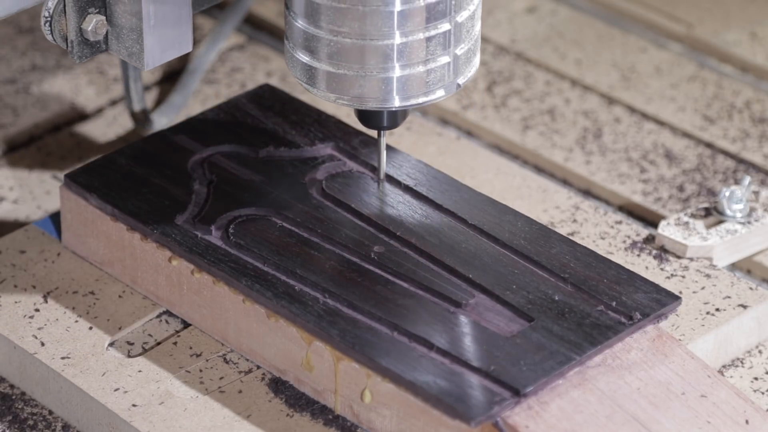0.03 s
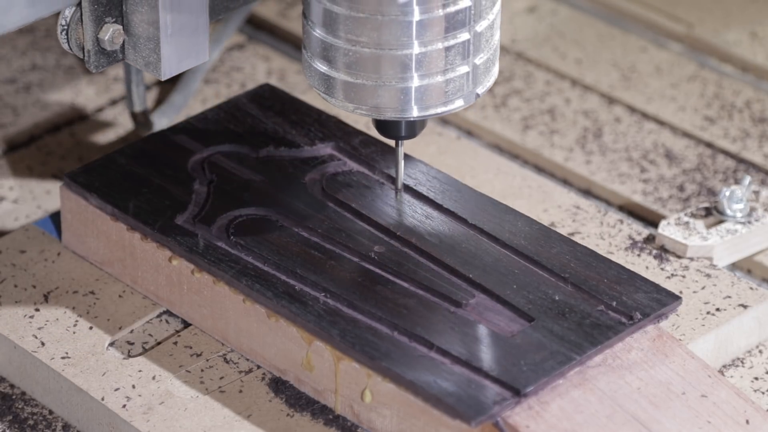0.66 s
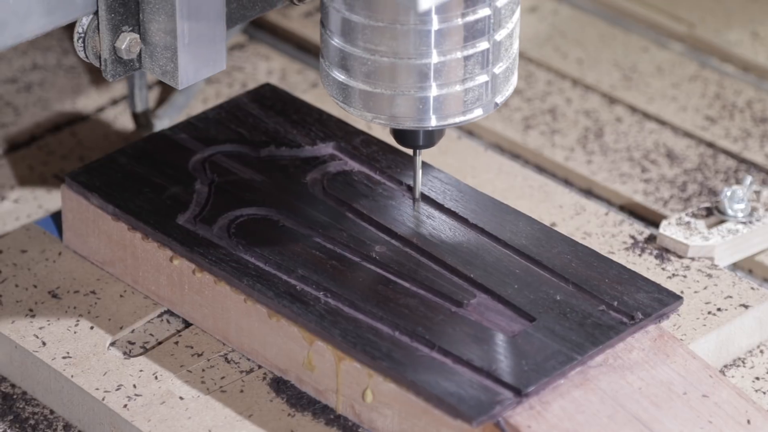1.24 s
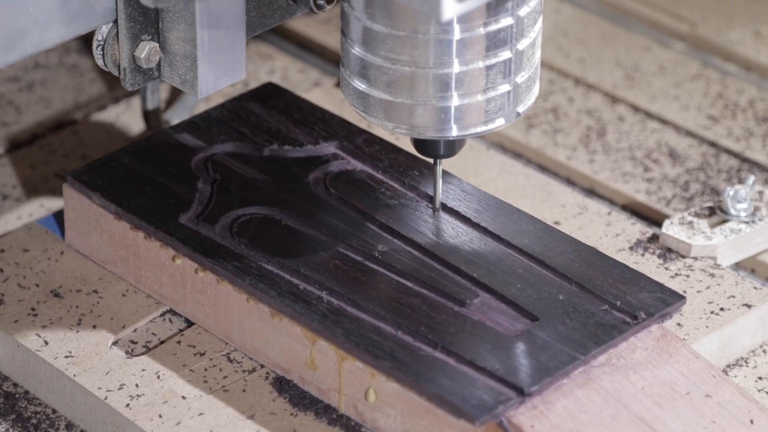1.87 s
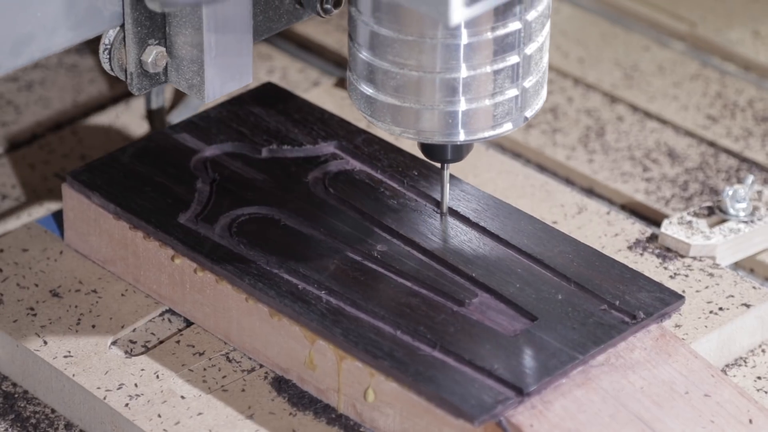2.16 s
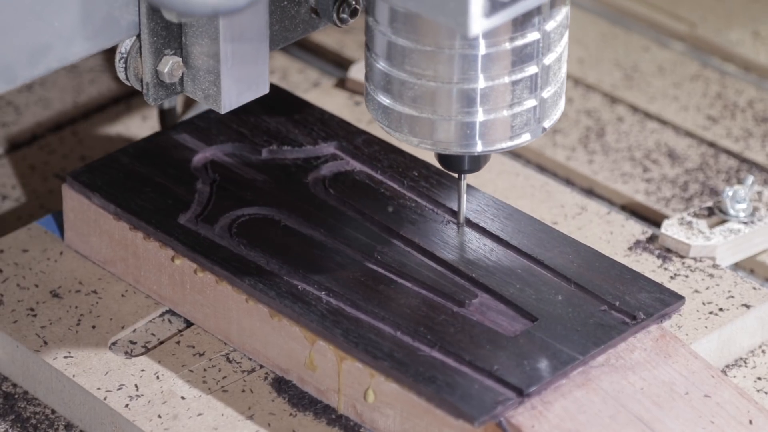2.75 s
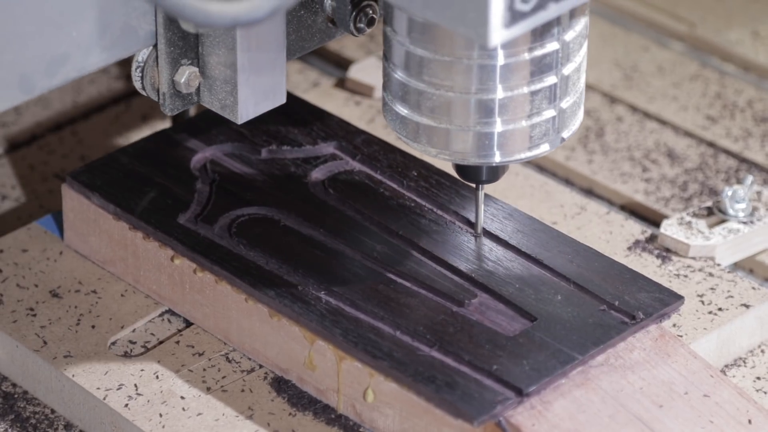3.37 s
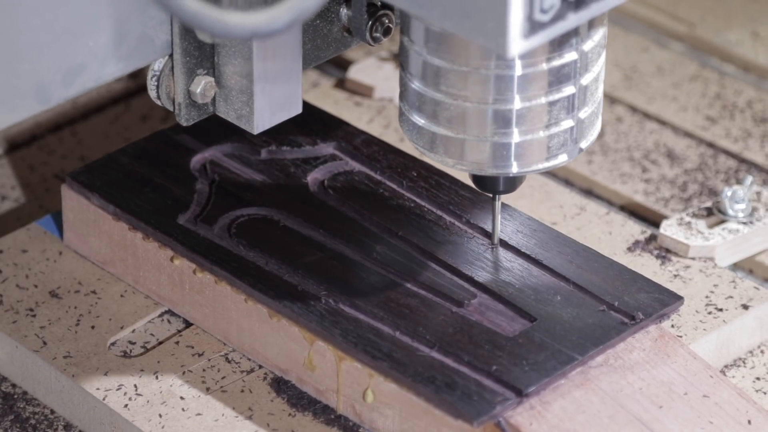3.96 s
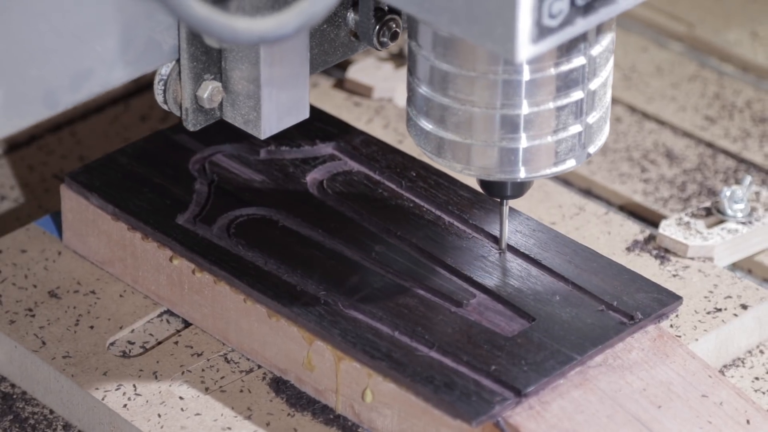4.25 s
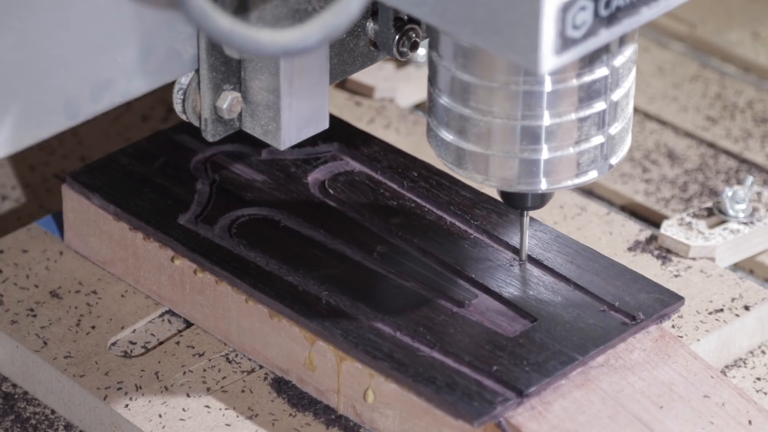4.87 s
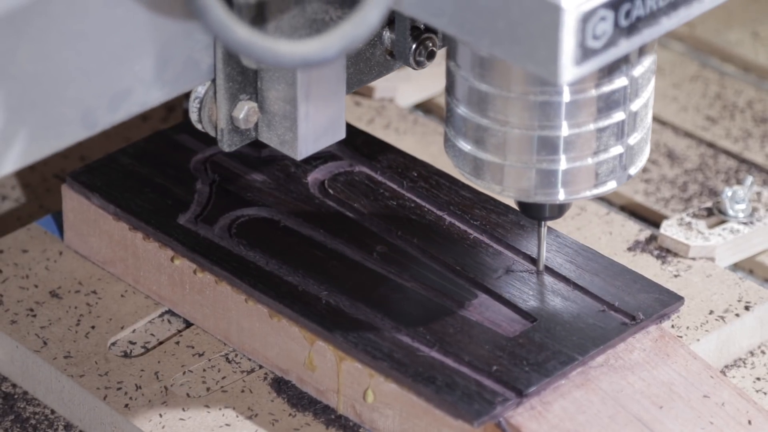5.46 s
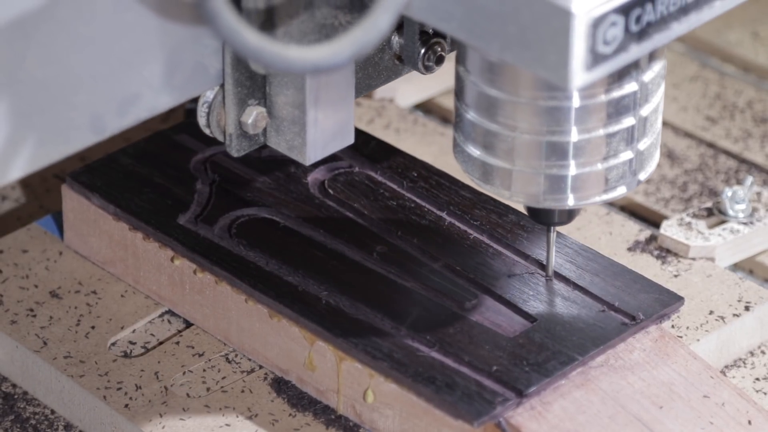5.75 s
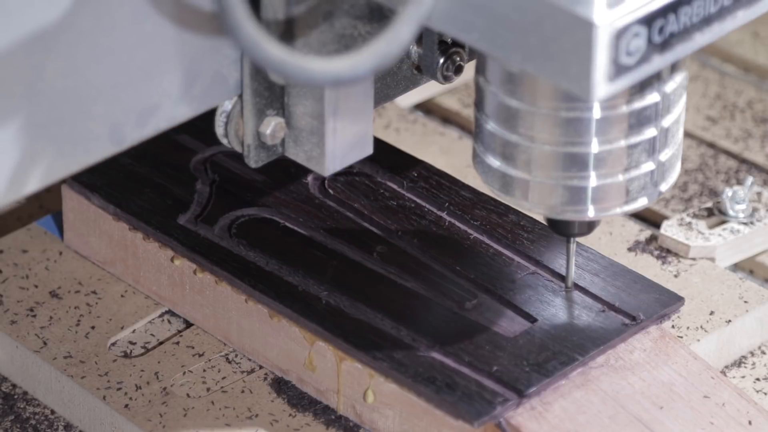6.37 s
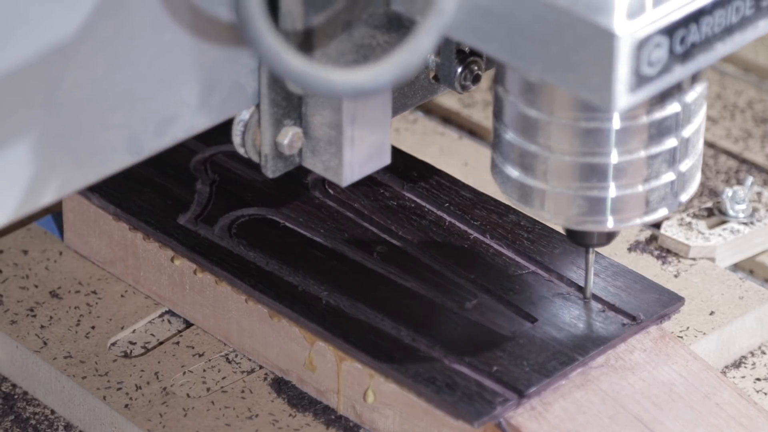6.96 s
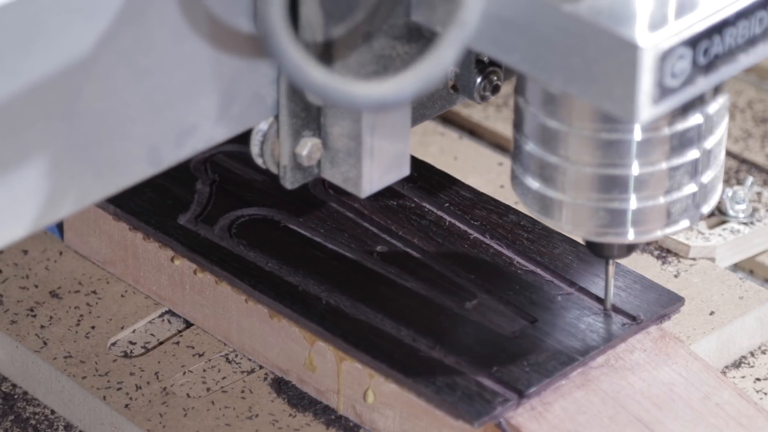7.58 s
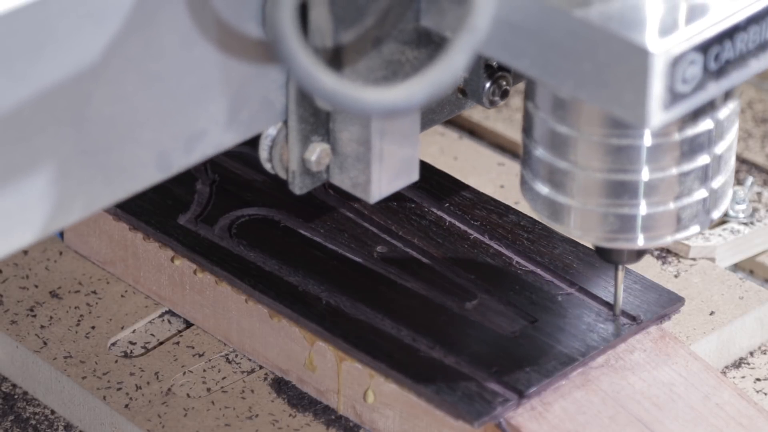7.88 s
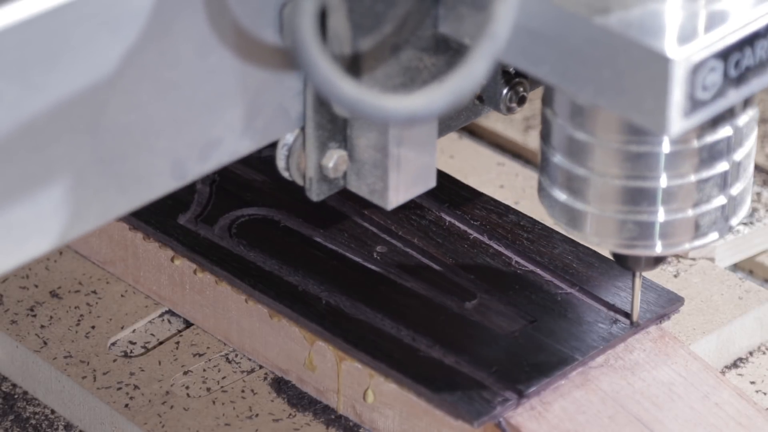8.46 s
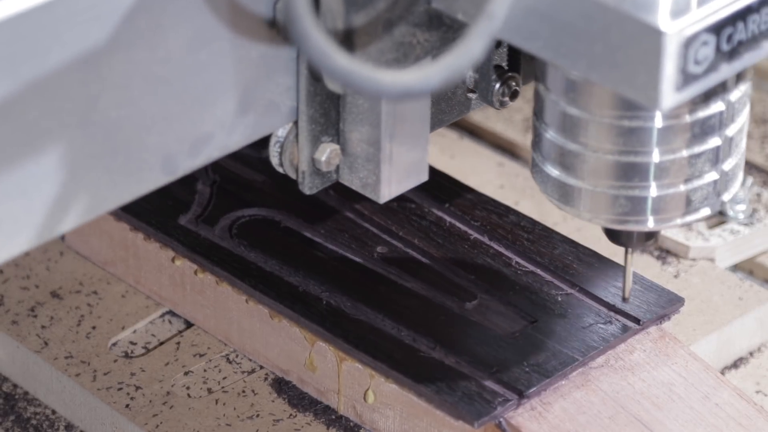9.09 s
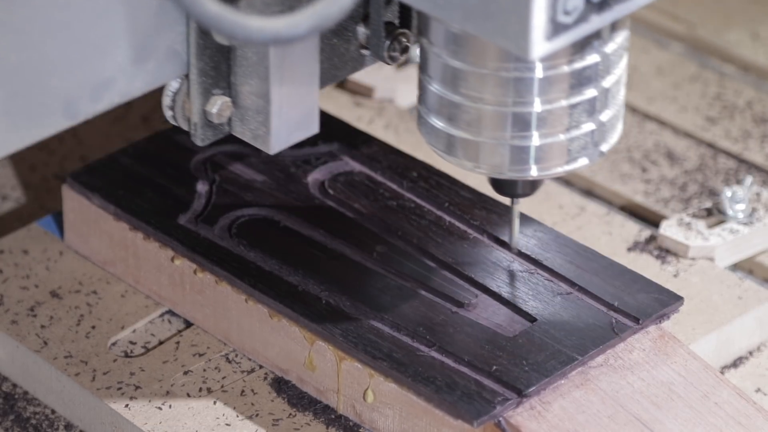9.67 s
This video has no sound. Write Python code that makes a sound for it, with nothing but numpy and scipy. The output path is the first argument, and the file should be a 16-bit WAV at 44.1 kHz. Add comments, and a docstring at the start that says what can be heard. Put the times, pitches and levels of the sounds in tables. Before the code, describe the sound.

A milling spindle whines as its bit hisses and chatters through wood, then squeals out of the cut while stepper motors whirr up.

```python
"""A workshop, with a stereo pair of microphones close to a CNC router cutting a groove in hardwood.
The small bit's two flutes tear off hissing chips, and its slender shank chatters between the
spindle's harmonics. The trim motor hums and whines at about 15700 rpm over the rush of its fan.
Near the end the bit squeals up out of the groove, the motor runs free and the stepper motors
whirr up for a rapid move."""
import sys
import numpy as np
from scipy import signal
from scipy.fft import rfft, irfft, next_fast_len
from scipy.io import wavfile

SR = 44100
rng = np.random.default_rng(int(sys.argv[2]) if len(sys.argv) > 2 else 0)


def materialize(psi):
    """Save the field psi as 16-bit PCM at rate SR to the path in sys.argv[1].

    A 1-D psi becomes a single channel; in a 2-D psi each row is a channel.
    """
    bounded = np.clip(np.atleast_2d(psi).T, -1, 1)
    quanta = np.round(bounded * 32767).astype(np.int16)
    wavfile.write(sys.argv[1], SR, quanta)


N = 429093
T = np.arange(N) / SR


def undb(db):
    """Decibels to gain."""
    return 10 ** (np.asarray(db) / 20)


def curves(table):
    """One sample-rate curve for each column after the time."""
    times, *columns = np.transpose(table)
    return [np.interp(T, times, column) for column in columns]


def swells(table, attack_s=0.024, release_s=0.045):
    """Attack, hold and release for each (start_s, length_s, size, ...) row; one curve per size column."""
    out = np.zeros((len(table[0]) - 2, N))
    for start, length, *sizes in table:
        near = slice(*np.searchsorted(T, [start - attack_s, start + length + release_s]))
        rise = (T[near] - start) / attack_s
        fall = (start + length - T[near]) / release_s
        out[:, near] += np.outer(sizes, np.clip(.5 + np.minimum(rise, fall), 0, 1))
    return out


def colour(points, hz):
    """Gain of a (frequency_hz, gain_db) spectrum at the given frequencies."""
    points_hz, db = np.transpose(points)
    return undb(np.interp(np.log(np.maximum(hz, 1)), np.log(points_hz), db))


def walk(rate):
    """Smooth random motion of spread 1 that changes about rate times a second."""
    hz = np.fft.rfftfreq(4096, T[-1] / 4096)
    motion = irfft(rfft(rng.standard_normal(4096)) * np.exp(-2 * (hz / rate) ** 2))
    return np.interp(T, np.linspace(0, T[-1], len(motion)), motion / motion.std())


def angle(hz):
    """Phase in radians of something that turns at hz."""
    return 2 * np.pi * np.cumsum(hz) / SR


def cosine(phase):
    """Cosine of a long-running phase, in single precision."""
    turns = phase / (2 * np.pi)
    return np.cos((2 * np.pi * (turns - np.floor(turns))).astype(np.float32))


def stereo(mid, side):
    """Left and right from mid and side."""
    return np.array([mid + side, mid - side])


def pan(sound, db):
    """Place a sound between the microphones by left minus right dB."""
    return sound * undb(np.array([[db], [-db]]) / 2)


# The workshop's reflections at the two microphones: frequency_hz, side_minus_mid_db
ROOM_WIDTH = [(40, -27), (110, -22), (270, -21), (520, -6), (800, -8), (1100, -9), (2000, -2), (4000, -2.5),
              (12000, -2)]


def tone(phase, gain, rough, rate=30):
    """A partial that trembles in strength; its reflections shift slowly as the gantry moves."""
    hz = phase[-1] / (2 * np.pi * T[-1])
    phase = phase + rng.uniform(0, 2 * np.pi)
    gain = gain * (1 + rough * walk(rate)) / np.sqrt(1 + rough ** 2)
    reflected = rng.choice([-1, 1]) * np.pi / 2 + .5 * walk(1.0)
    return stereo(gain * cosine(phase), gain * colour(ROOM_WIDTH, hz) * cosine(phase + reflected))


def noise(points):
    """Stereo noise of the given colour, rms 1 in the middle, wider in the treble."""
    size = next_fast_len(N, True)
    hz = np.fft.rfftfreq(size, 1 / SR)
    mid, side = rfft(rng.standard_normal((2, size))) * colour(points, hz)
    mid = irfft(mid, size)[:N]
    side = irfft(side * colour(ROOM_WIDTH, hz), size)[:N]
    return stereo(mid, side) / mid.std()


# The spindle sags under load and rises once free: time_s, speed_hz
SPINDLE_SPEED = [(0, 261.5), (0.5, 261.8), (5.8, 261.85), (6.5, 262.15), (6.6, 261), (7.45, 261.7),
                 (7.55, 262.3), (8.2, 262.1), (8.37, 261.2), (8.46, 262.1), (8.7, 263), (9.05, 263),
                 (9.5, 262.3)]
HUNT_RATE_HZ, HUNT_DEPTH_HZ, HUNT_CREST_S, HUNT_SETTLES_S = 2.24, 0.37, 1.85, 3.59


def spindle_speed():
    """Turns a second: the governor overshoots back and forth, then settles."""
    hz, = curves(SPINDLE_SPEED)
    unsettled = np.clip(.5 + HUNT_SETTLES_S - T, 0, 1)
    hunting = HUNT_DEPTH_HZ * unsettled * np.cos(2 * np.pi * HUNT_RATE_HZ * (T - HUNT_CREST_S))
    return hz + hunting + 0.0922 * walk(6.6)


# Chip hiss and the bit's resonances near 3.1, 3.6 and 4.1 kHz: time_s, hiss_db, low_db, mid_db, high_db
STEADY_CUT = [(0, -32, -37.5, -29.5, -43), (1.7, -33, -37.5, -40, -35), (3.3, -33, -33.5, -37, -32.5),
              (4.6, -31, -28.5, -38.5, -30.5), (6.45, -33, -35, -41, -30.5), (6.65, -31, -30.5, -32, -30),
              (7.5, -33, -31.5, -30.5, -30.5), (7.7, -37, -28.5, -46, -33.5),
              (8.45, -32.5, -36, -36, -32.5), (8.68, -30, -37, -44, -46), (8.76, -56, -49, -47, -46),
              (9.4, -31, -43, -44, -48)]
# The bit digs into hard grain and bursts into chatter: start_s, length_s, hiss_rise_db, chatter_rise_db
GRAIN_BITES = [(0.01, 0.12, -0.5, 12), (0.22, 0.11, 1, 2), (0.32, 0.13, -1, 15), (0.71, 0.12, 3.5, 7),
               (0.82, 0.13, 1, 15.5), (1.02, 0.094, 3, 12), (1.15, 0.089, 3, 13), (1.64, .09, 2, 14.5),
               (2.07, .24, 2.5, 7), (2.34, 0.067, 2, 13), (2.68, 0.3, 1.5, -4), (2.93, .17, 2.5, 8),
               (3.26, 0.19, 2.5, 13), (3.52, 0.16, 1.5, 11), (3.79, 0.15, 0, 12), (4.11, 0.097, -1.5, 7.5),
               (4.44, .12, 1.5, 8), (4.64, 0.15, 1.5, 9), (4.85, 0.3, 2, 10.5), (5.26, 0.11, 0.5, 8),
               (5.51, 0.19, 2.5, 10.5), (5.73, 0.53, 1, 8), (6.32, 0.27, 0.3, 8.5), (6.57, 0.079, 2.5, 2),
               (6.86, .15, 1, 5), (7.13, 0.085, 0, 6), (7.35, 0.16, 0.5, 4), (7.83, .09, 4, 4),
               (8.1, 0.11, 2.5, 7), (8.23, 0.21, 3.5, 12)]
# How the mid and high resonances follow a bite, a row each: db_per_hiss_db, db_per_chatter_db
RESONANCE_RISE = [(3, -0.08), (1.0, 0.226)]
# The bit finds little wood and the whole cut slackens: start_s, length_s, drop_db
SLACK_SPOTS = [(0.11, 0.065, 5), (4.33, .08, 2.5), (5.35, 0.067, 8), (7.01, 0.12, 3), (7.61, 0.058, 11),
               (8.45, .08, 8)]


def cutting_levels():
    """Levels of the hiss and the three resonances: the steady cut, with its bites and slack spots."""
    hiss_db, low_db, *upper_db = curves(STEADY_CUT) - swells(SLACK_SPOTS)
    hiss_rise, chatter_rise = swells(GRAIN_BITES)
    upper_db = [db + by_hiss * hiss_rise + by_chatter * chatter_rise
                for db, (by_hiss, by_chatter) in zip(upper_db, RESONANCE_RISE)]
    return hiss_db + hiss_rise, [low_db + chatter_rise, *upper_db]


# Tearing hardwood, heard from close by: frequency_hz, gain_db
CHIP_COLOUR = [(400, -43), (900, -34), (1900, -13), (2400, -1.5), (2900, 2), (3900, -0.5), (4600, -4.5),
               (5700, -1), (6600, 1.5), (7700, 3.5), (8900, -3.5), (9800, 1), (11000, -5), (16000, -12)]


def chips(turn, contact, hiss_db):
    """Each pass of the two flutes tears off chips of uneven size: a hiss that throbs with the turn."""
    throb_db = 0.44 * cosine(turn) + 0.45 * cosine(2 * turn) + 0.99 * walk(180) + 0.4 * walk(40)
    return noise(CHIP_COLOUR) * contact * undb(hiss_db + throb_db + 4.5)


# The ringing bit, struck lightly (0) to hard (1): time_s, cycles_per_turn, hardness
BIT_RING = [(0, 11.71, 0), (.8, 11.73, 0), (2.9, 11.72, .1), (3.4, 11.7, .3), (4.8, 11.7, .6),
            (6.5, 11.69, .7), (6.62, 11.63, 1), (7.5, 11.635, 1), (7.6, 11.64, .8), (8.4, 11.65, 1)]
# Weaker tones either side of the ring: offset_cycles_per_turn, light_strike_db, hard_strike_db
RING_SIDEBANDS = [(-2, -44, -39.5), (-1, -39, -39.5), (1, -48, -37.5), (3, -50, -42), (5, -49, -46),
                  (6, -51, -51), (7, -52, -46), (13, -47, -51)]
SPUTTER_DB, SPUTTER_HZ = 1.6, 30.3  # the chatter keeps catching and losing its grip


def chatter(spindle_hz, turn, levels_db):
    """The bit rings in bursts near 3 kHz; each turn strikes it anew, spreading sidebands a turn apart."""
    ratio, hardness = curves(BIT_RING)
    low, mid, high = (undb(db + SPUTTER_DB * walk(SPUTTER_HZ)) for db in levels_db)
    ring = angle(ratio * spindle_hz) + 0.11 * walk(25)
    out = tone(ring, low * undb(-2.5), rough=.15)
    # two sidebands meet resonances of their own and flare separately
    out += tone(ring + 2 * turn + .4 * walk(30), mid, rough=.35)
    out += tone(ring + 4 * turn + .3 * walk(30), high * undb(-2.5), rough=.2)
    swell = (mid * high * undb(81)) ** .3  # the weaker ones gently follow those two
    for offset, light_db, hard_db in RING_SIDEBANDS:
        db = light_db + hardness * (hard_db - light_db)
        out += tone(ring + offset * turn + .4 * walk(30), swell * undb(db), rough=.4)
    return out * np.interp(T, [8.42, 8.49], [1, 0])  # the ringing stops as the bit starts to rise


# The once-a-turn hum, held down while the bit is pressed hard: time_s, level_db
UNBALANCE = [(0.06, -30.5), (0.67, -29), (1.02, -30), (1.72, -27.5), (4.02, -28), (4.68, -26.5),
             (5.94, -28.5), (6.53, -27.5), (6.66, -32.5), (7.25, -31.5), (7.44, -33), (7.71, -27.5),
             (8.29, -25.5), (8.4, -34), (8.51, -24.5), (8.99, -22.5), (9.12, -19.5), (9.66, -19)]
# Its strongest overtone: time_s, level_db
FOURTH_HARMONIC = [(0, -28), (1.1, -28), (1.38, -24.5), (2.1, -29), (2.75, -26), (3.5, -32), (4.5, -27.5),
                   (6.48, -31), (6.59, -24.5), (6.7, -39.5), (7.27, -30), (7.6, -37.5), (8.28, -29.5),
                   (8.35, -25), (8.43, -43), (8.55, -35), (8.75, -41), (9.73, -34.5)]


def motor_hum(turn):
    """Unbalance hums once a turn, just left of centre, and shakes the frame."""
    hum_db, = curves(UNBALANCE)
    fourth_db, = curves(FOURTH_HARMONIC)
    hum = tone(turn, undb(hum_db + 3.5), rough=0.015)
    hum += tone(4 * turn, undb(fourth_db + 1.53 + 0.75 * walk(3.5)), rough=0.019)
    return pan(hum, db=0.65) + frame_shake(hum_db)


# The shaking frame: frequency_hz, gain_db
SHAKE_COLOUR = [(20, -19), (40, 16.5), (80, -36), (135, 10.5), (200, 0), (400, -40), (1500, -38)]


def frame_shake(hum_db):
    """A faint low rumble that follows the unbalance."""
    return noise(SHAKE_COLOUR) * undb(hum_db - 35.0)


# Each low harmonic swells, holds and fades at the microphones; where rise and fall overlap, they cancel:
# harmonic, base_db, rises_until_s, falls_from_s, slope_db_per_s, heavy_cut_drop_db, free_db
LOW_HARMONICS = [(2, -28.5, 1, 1.34, 2.5, 0.5, -40), (3, -31.5, 1.4, 7.6, 6, 2.5, -42),
                 (5, -34.5, 3, 4.6, 0.6, 3, -43), (6, -34, 2.1, 3.8, 3.0, -2, -57),
                 (9, -34, 7.5, 4.8, 1.5, 18, -58), (10, -33.5, .35, 1.2, 2, 12, -40),
                 (12, -32.5, -6, 2.2, 1.8, -2, -33.5)]
# The bit is pressed hard into the wood: start_s, length_s, share
HARD_PRESS = [(6.58, 0.98, 0.84)]
RIPPLE_DB, RIPPLE_HZ = 2.5, 2.8  # standing waves on the way to the microphones, at the tenth harmonic
BITE_LIFT = 0.46  # dB per dB of hiss at the twelfth harmonic, near the bit's 3 kHz resonance


def motor_harmonics(turn, contact):
    """Fan, commutator and flutes add harmonics; each swells and fades its own way as the gantry moves."""
    heavy, = swells(HARD_PRESS)
    bite_db, _ = swells(GRAIN_BITES)
    out = np.zeros((2, N))
    for harmonic, base_db, rises_until_s, falls_from_s, slope_db_per_s, heavy_db, free_db in LOW_HARMONICS:
        fade_s = np.maximum(rises_until_s - T, 0) + np.maximum(T - falls_from_s, 0)
        db = base_db - slope_db_per_s * fade_s - heavy_db * heavy
        db += RIPPLE_DB * np.sqrt(harmonic / 10) * walk(RIPPLE_HZ)
        db += BITE_LIFT * (harmonic / 12) ** 2 * bite_db
        gain = contact ** 2 * undb(db) + (1 - contact ** 2) * undb(free_db)
        out += tone(harmonic * turn, gain, rough=.11)
    return pan(out, db=-2.0)


# The motor's upper partials, in the wood and running free: harmonic, cutting_db, free_db
WHINE_PARTIALS = [(7, -42.5, -52), (8, -47, -57), (11, -42, -60), (13, -41, -33.5), (14, -47, -42),
                  (15, -46, -60), (16, -45, -44), (17, -49, -51), (18, -51, -50), (19, -52, -51),
                  (22, -53, -44), (23, -52, -48), (24, -42, -36), (25, -48, -50), (26, -49, -48),
                  (32, -52, -49), (33, -51, -48), (34, -58, -46), (35, -53, -44), (36, -43.5, -53),
                  (38, -51, -47), (40, -55, -49)]


def motor_whine(turn, contact):
    """The upper harmonics whine, rougher while the grain twists the bit back and forth."""
    load = contact ** 2
    twist = .005 * load * walk(60)
    out = np.zeros((2, N))
    for harmonic, cutting_db, free_db in WHINE_PARTIALS:
        rms = load * undb(cutting_db) + (1 - load) * undb(free_db - 1)
        out += tone(harmonic * (turn + twist), np.sqrt(2) * rms, rough=.1 + .35 * load, rate=9.8)
    return out


# The bearing's two pitches: cycles_per_turn
BALL_RATIOS = (11.06, 13.825)
# Their strengths: level_db
BALL_LEVELS = (-45, -42.5)


def bearing(turn, torque):
    """The balls of the bearing sing between the harmonics, throbbing with the torque."""
    throb = 1 + 0.9 * cosine(torque)
    return sum(tone(ratio * turn, throb * undb(db), rough=0.22)
               for ratio, db in zip(BALL_RATIOS, BALL_LEVELS))


# Tones one torque rate below (-1) or above (1) a harmonic: harmonic, side, level_db
TORQUE_TONES = [(2, 1, -42), (3, -1, -46), (4, 1, -41), (5, -1, -45), (12, 1, -47), (13, 1, -49)]


def mains_buzz(turn, torque):
    """A faint mains hum and the pulsing torque's side tones swell and fade as the motor moves past."""
    passing = undb(np.interp(T, [0, 2.2, 4.5, 7, 9.7], [1.0, 4.5, 0.0, -5, -3.5]))
    sides = sum(tone(harmonic * turn + side * torque, passing * undb(db + 1.5), rough=0.27)
                for harmonic, side, db in TORQUE_TONES)
    return sides + tone(torque, passing * undb(-65.0), rough=0.43)


# Cooling air reaching the microphones: time_s, level_db
AIR_RUSH = [(0.0, -41), (1.5, -39), (4.8, -39), (6.55, -40.5), (6.8, -43), (8.2, -39), (8.85, -41),
            (9.2, -35.5), (9.73, -35)]
# The fan's rush: frequency_hz, gain_db
FAN_COLOUR = [(85, -20), (150, -24), (240, 2), (370, -5.5), (560, 0.5), (700, 6), (900, 2.5), (1150, 7),
              (1380, 7), (1560, -0.5), (2500, -2), (6000, -21.5)]
# The brushes' hiss: frequency_hz, gain_db
BRUSH_COLOUR = [(450, -49), (1000, -40), (1700, -6), (2400, -4.5), (3300, 2), (4600, -3.5), (6400, -3),
                (8500, -1), (10500, -7), (13000, -9), (16000, -26)]


def fan_and_brushes(turn, torque):
    """The cooling fan rushes in time with the shaft; the brushes hiss in time with the mains."""
    rush_db, = curves(AIR_RUSH)
    fan = noise(FAN_COLOUR) * undb(rush_db + 6.5 + walk(30))
    fan *= 1 + 0.16 * cosine(turn) + 0.053 * cosine(2 * turn)
    # the brushes sound through the same vents, so they swell a little with the rush
    brushes = noise(BRUSH_COLOUR) * undb(.35 * rush_db - 15 + 1.56 * walk(27))
    brushes *= 1 + 0.06 * cosine(torque)
    return fan + brushes


# The bit leaves the groove: time_s, pitch_hz, level_db
EXIT_SQUEAL = [(8.43, 3050, -90), (8.46, 3050, -27), (8.5, 3030, -30), (8.54, 2950, -30), (8.6, 2900, -26),
               (8.67, 3100, -24), (8.71, 3120, -33), (8.76, 3120, -90)]
# The rubbing shakes the shaft: harmonic, offset_db
SHAFT_BUZZ = [(5, -6), (7, -1.5)]


def exit_squeal(turn):
    """The rising bit rubs the groove's wall: a stuttering squeal that dips and climbs, over a buzz."""
    hz, db = curves(EXIT_SQUEAL)
    stutter_db = 3 * walk(60)
    squeal = tone(angle(hz + 120 * walk(350)), undb(db + stutter_db - 3), rough=.7, rate=90)
    buzz = sum(tone(harmonic * turn, undb(db + offset_db), rough=.3) for harmonic, offset_db in SHAFT_BUZZ)
    return squeal + buzz


# The lift and the rapid move: time_s, step_rate_hz, tone_db, rumble_db
STEPPER_MOVES = [(0, 170, -90, -70), (8.38, 170, -90, -65), (8.5, 190, -50, -44), (9.08, 190, -48, -42),
                 (9.17, 215, -33, -36), (9.24, 360, -42, -36), (9.275, 416, -31, -43),
                 (9.73, 416, -30, -41)]
# The frame rumbling under the steppers: frequency_hz, gain_db
RUMBLE_COLOUR = [(30, -20), (110, -24), (190, -2), (240, 12.5), (300, 1), (450, 3), (900, -6), (3000, -50)]


def steppers():
    """The bit is lifted with a low rumble; then two axes speed up to different step rates."""
    hz, tone_db, rumble_db = curves(STEPPER_MOVES)
    step = angle(hz)
    fast_axis = tone(step, undb(tone_db), rough=0.11) + tone(3 * step, undb(tone_db - 15), rough=.2)
    slow_axis = tone(.83 * step, undb(tone_db - 8), rough=0.8)
    return fast_axis + slow_axis + noise(RUMBLE_COLOUR) * undb(rumble_db)


# The bit in the wood (1) or clear of it (0): time_s, contact
WOOD_CONTACT = [(0, 1), (8.4, 1), (8.48, 0.2), (8.56, 1), (8.68, 0.87), (8.76, 0.7), (9.73, 0)]
TORQUE_HZ = 120  # the torque pulses twice a mains cycle


def scene():
    """Cut and motor follow the one shaft; from the microphones the cut lies a little to the right."""
    spindle_hz = spindle_speed()
    turn, torque = angle(spindle_hz), 2 * np.pi * TORQUE_HZ * T
    contact, = curves(WOOD_CONTACT)
    hiss_db, chatter_db = cutting_levels()
    cut = chips(turn, contact, hiss_db) + chatter(spindle_hz, turn, chatter_db) + exit_squeal(turn)
    motor = motor_hum(turn) + motor_harmonics(turn, contact) + motor_whine(turn, contact)
    machine = motor + bearing(turn, torque) + mains_buzz(turn, torque) + steppers()
    return machine + pan(fan_and_brushes(turn, torque), db=-1.5) + pan(cut, db=-2.0)


def record(dry):
    """The recorder cuts the top steeply above 15.75 kHz."""
    return signal.sosfilt(signal.ellip(10, .2, 80, 15750, fs=SR, output="sos"), dry)


dry = scene()
out = record(dry)
materialize(out)
```